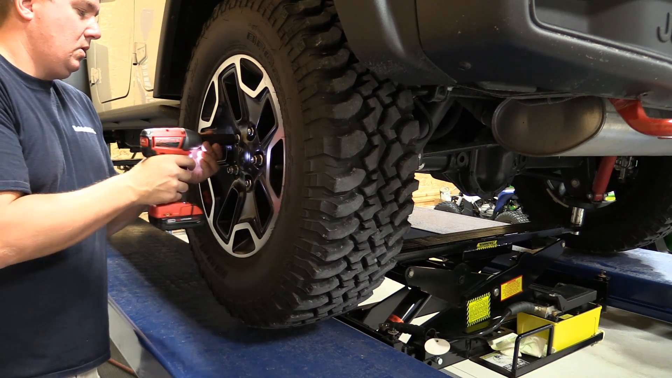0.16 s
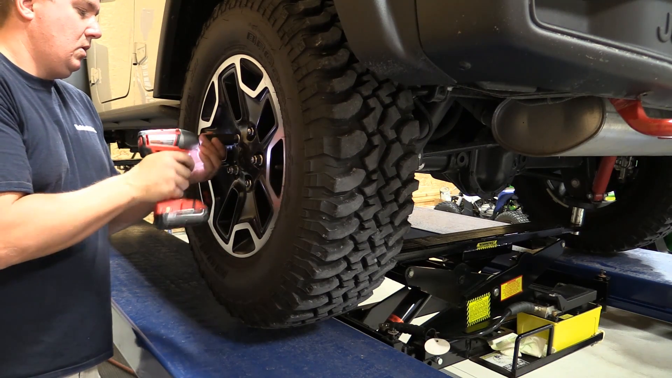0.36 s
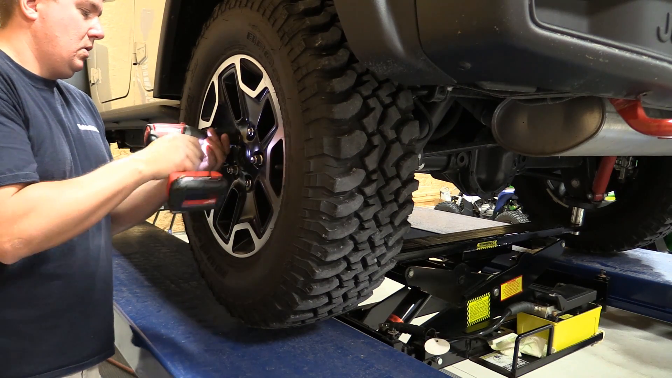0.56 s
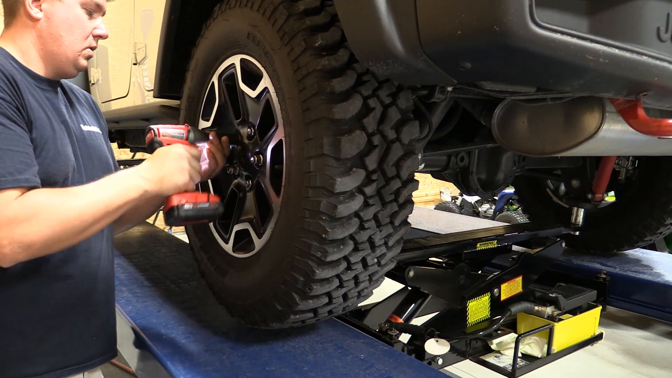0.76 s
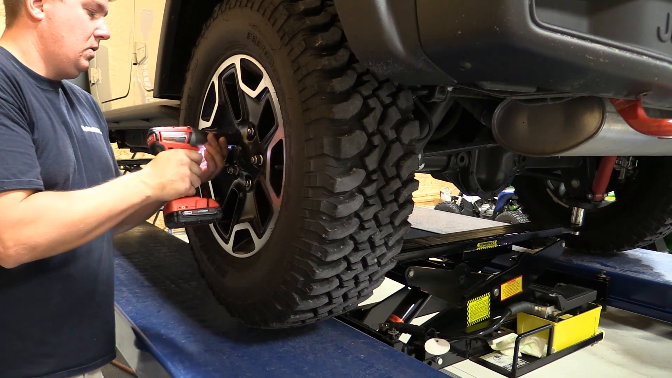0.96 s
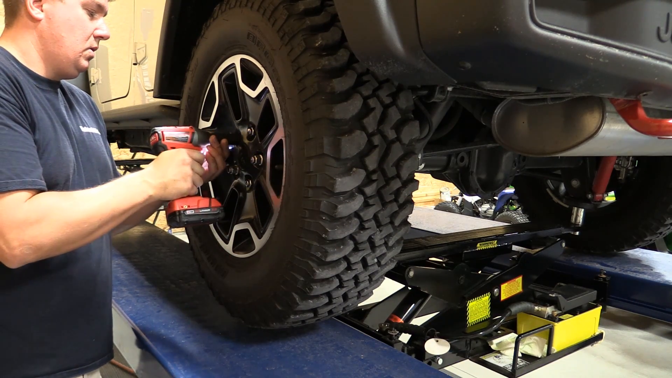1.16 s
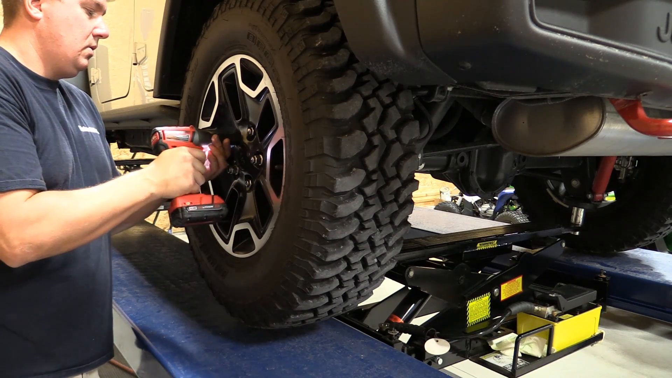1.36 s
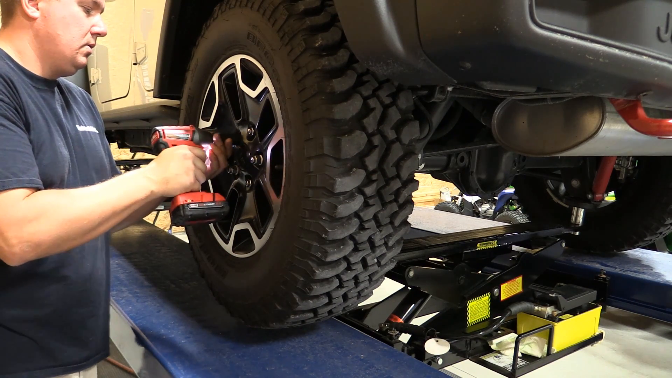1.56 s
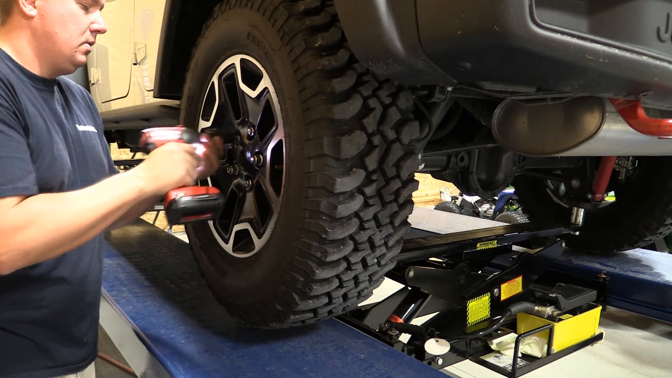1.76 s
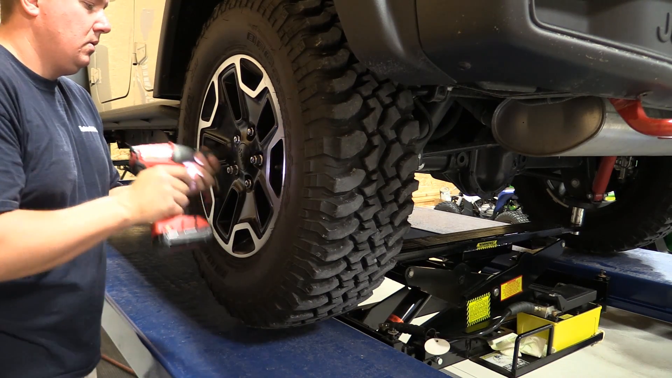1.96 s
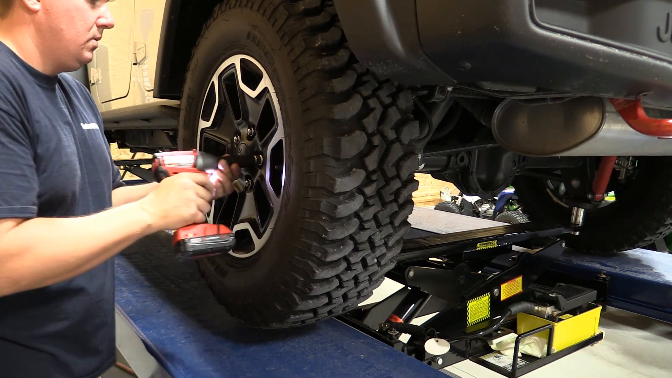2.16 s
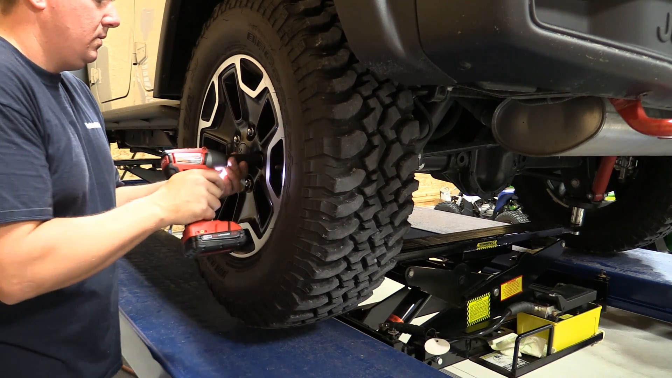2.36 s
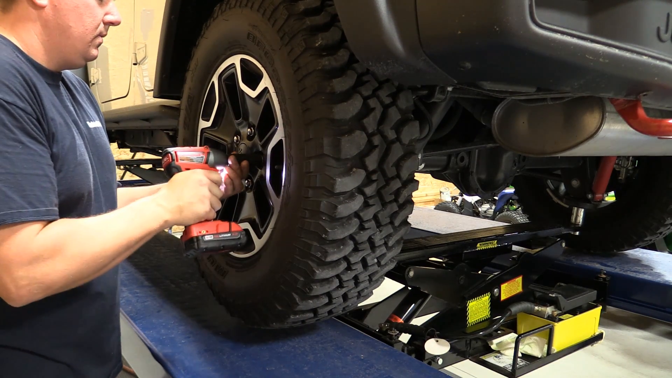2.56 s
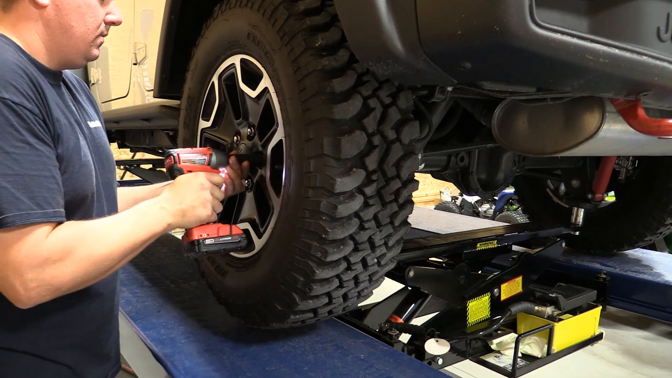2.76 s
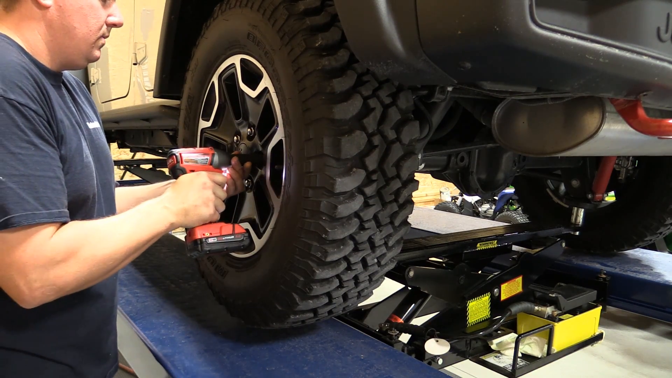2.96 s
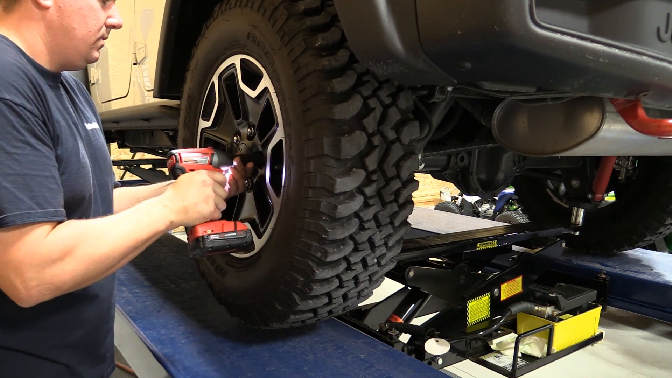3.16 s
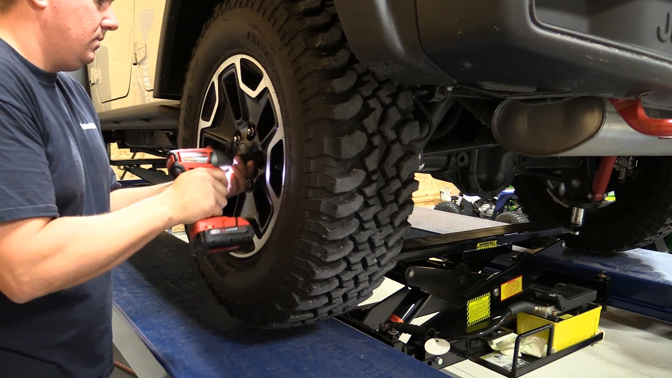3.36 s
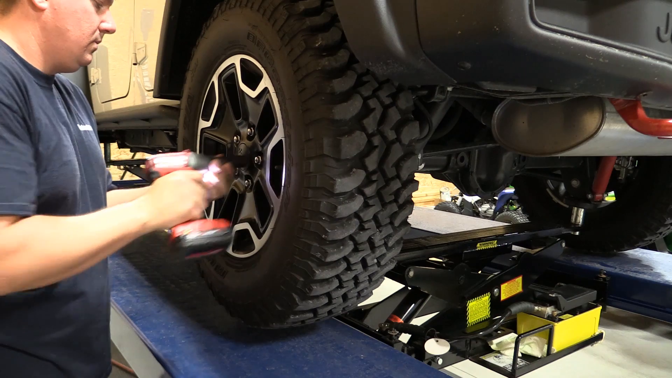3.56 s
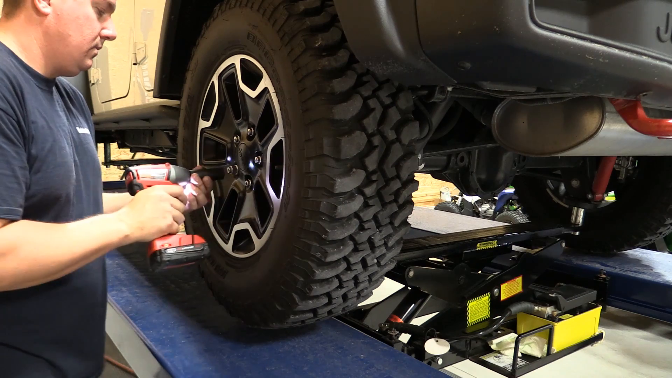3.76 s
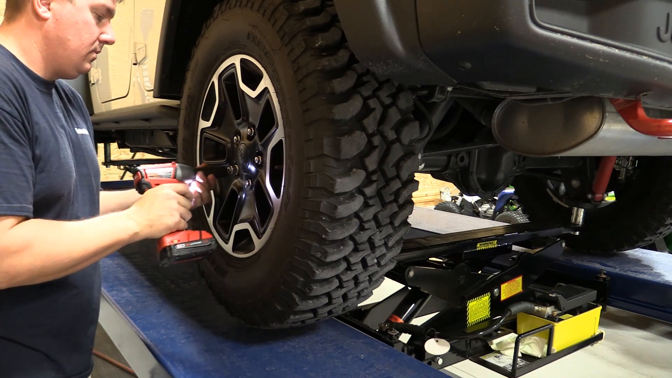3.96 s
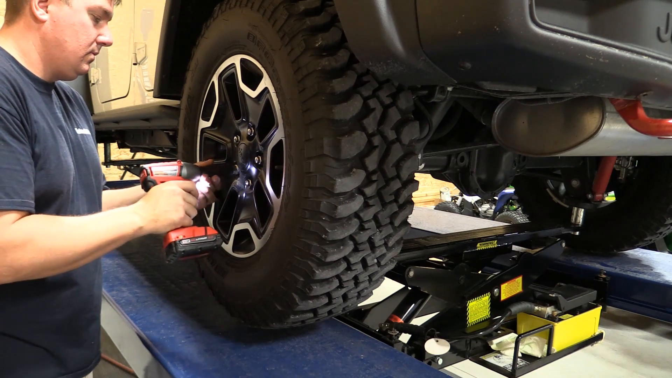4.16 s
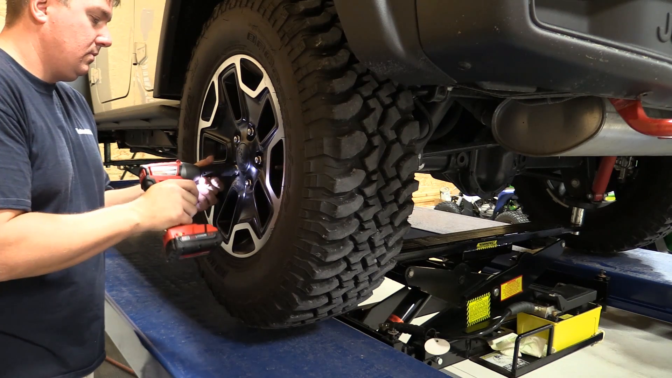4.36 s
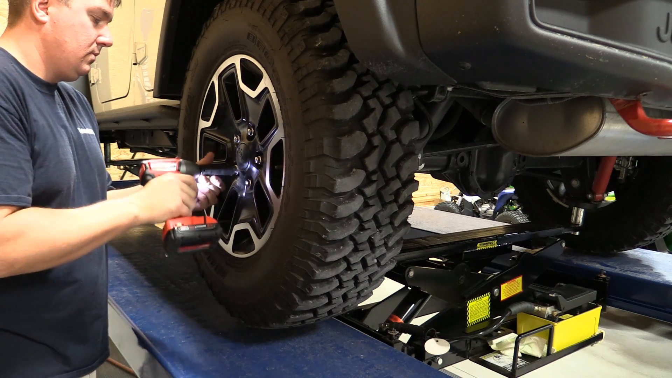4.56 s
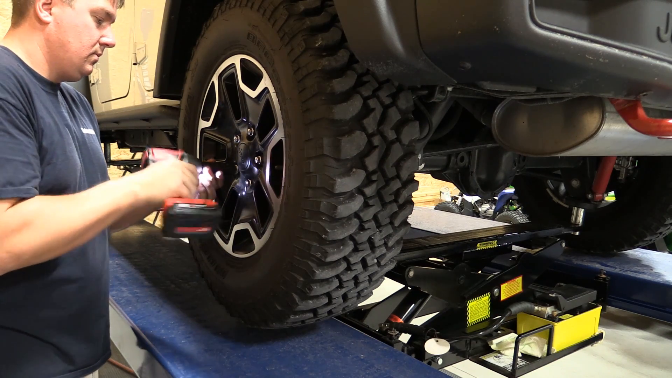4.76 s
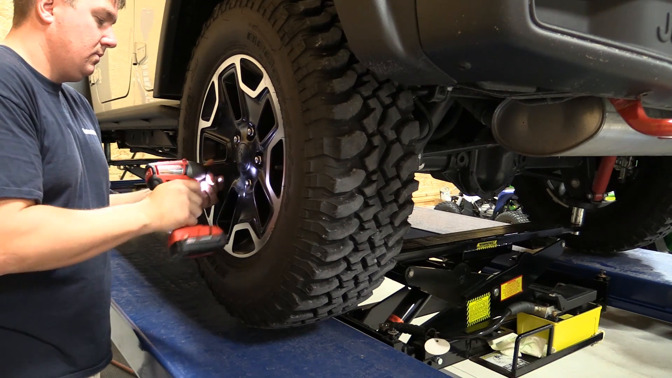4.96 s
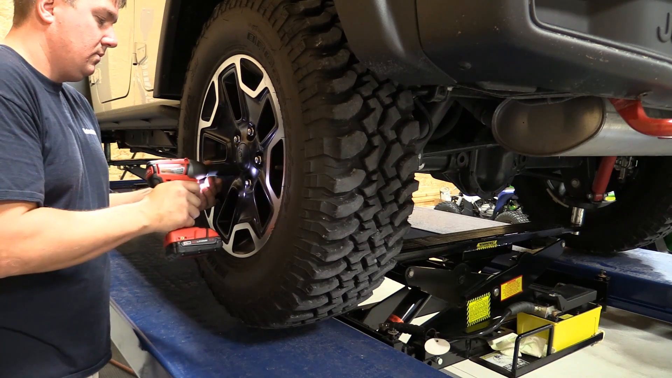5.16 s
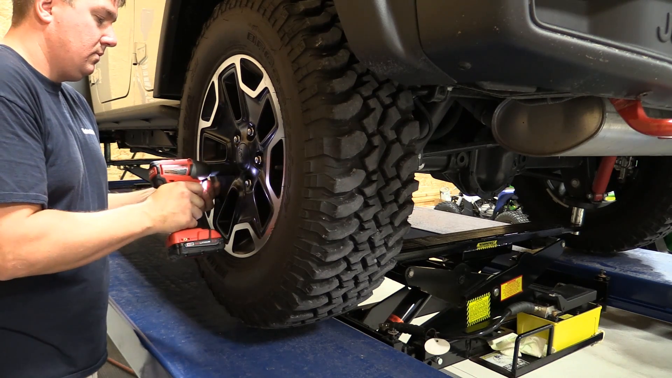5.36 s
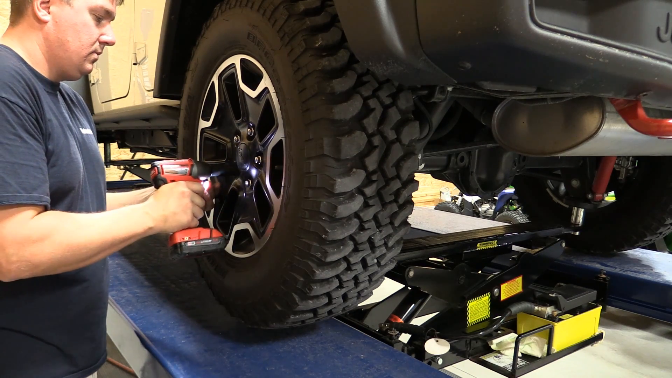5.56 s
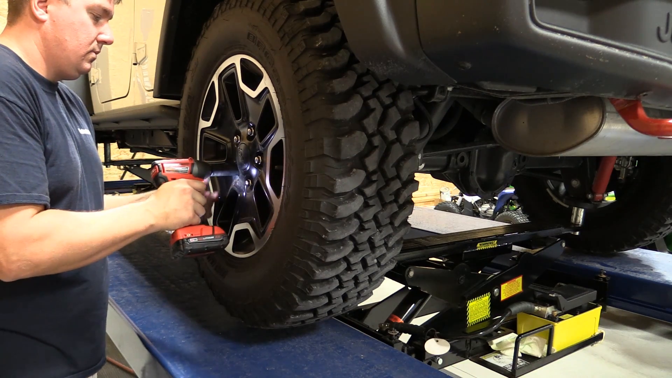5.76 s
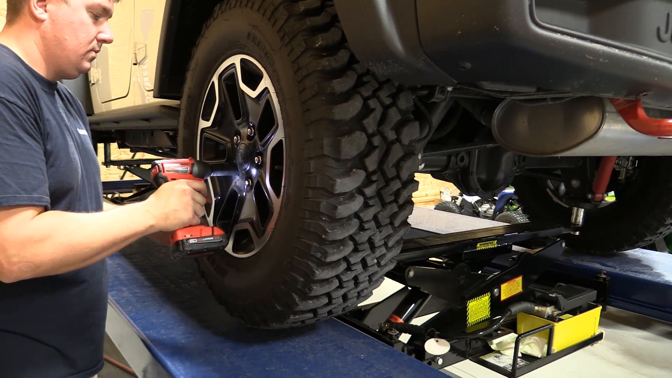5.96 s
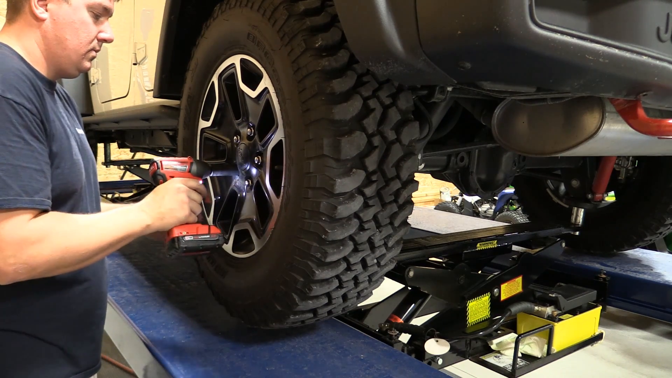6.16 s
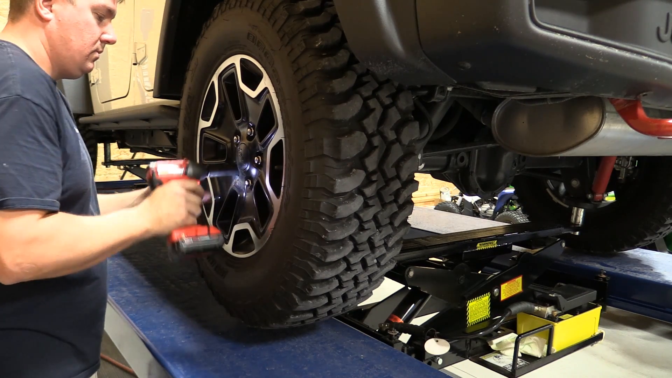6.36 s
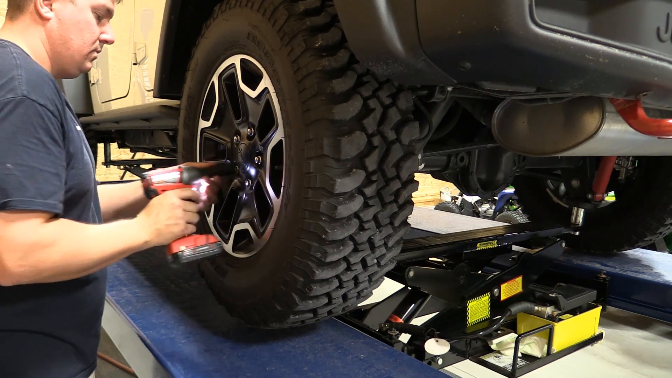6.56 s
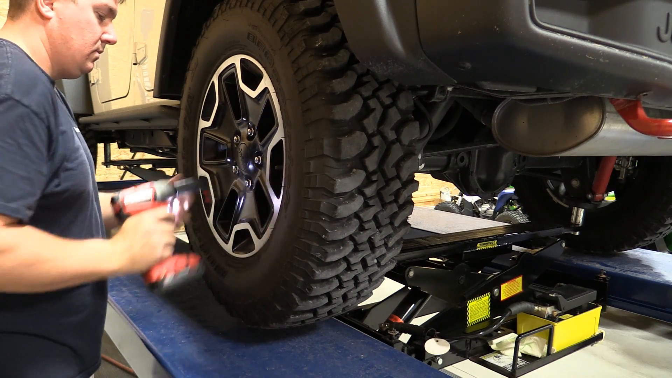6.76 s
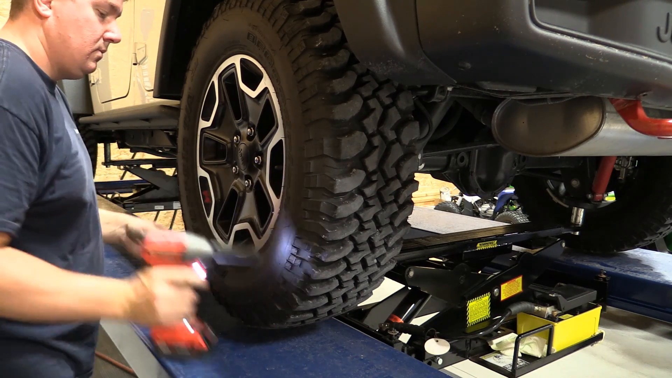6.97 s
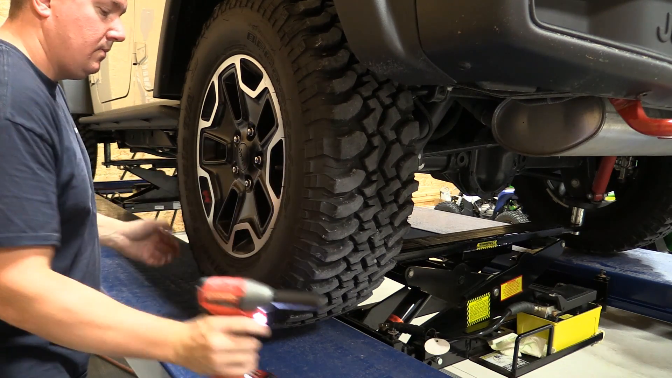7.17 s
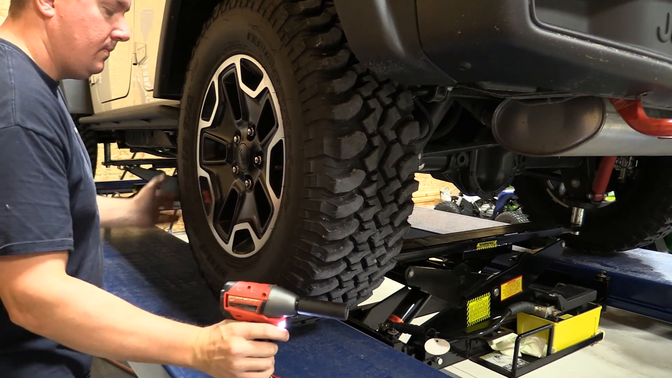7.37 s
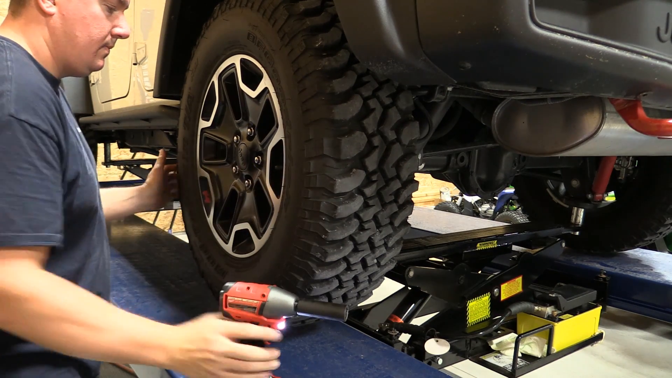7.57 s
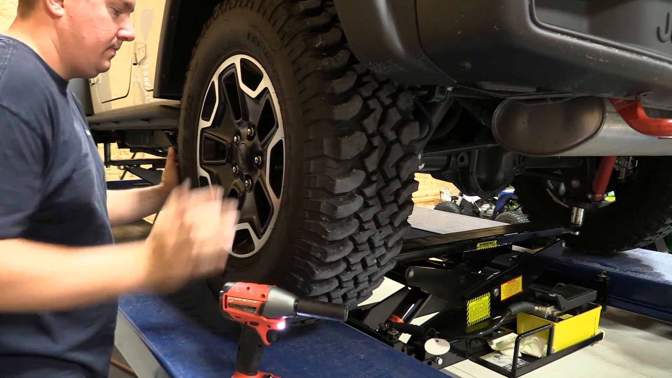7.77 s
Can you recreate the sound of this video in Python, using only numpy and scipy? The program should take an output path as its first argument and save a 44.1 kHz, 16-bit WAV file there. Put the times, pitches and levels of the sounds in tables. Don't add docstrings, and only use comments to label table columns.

```python
import sys
import numpy as np
from scipy import signal
from scipy.fft import rfft, irfft
from scipy.io import wavfile
from scipy.ndimage import uniform_filter1d

SR = 44100
rng = np.random.default_rng(int(sys.argv[2]) if len(sys.argv) > 2 else 0)


def undo_db(level):
    steps = np.asarray(level, float) / 20
    return 10 ** steps


def int16_out(signal):
    q = np.round(np.clip(np.atleast_2d(signal).T, -1, 1) * 32767)
    wavfile.write(sys.argv[1], SR, q.astype(np.int16))


N = 345303
T = np.arange(N) / SR

# frequency in Hz, level in dB per Hz.
AIR = [(15, -3.5), (27, 0.5), (40, 3), (58, -2), (160, 2), (250, -1.5), (500, -6.5), (1000, -17),
       (3000, -23), (6000, -33), (10000, -31.5), (16000, -32.5)]
AIR_DB = -56
# frequency in Hz, width in Hz, level in dB.
HUM = [(83, 34, -56), (102, 8.3, -61), (118.7, 4, -51.5)]
# start in s, length in s, pitch in Hz, level in dB.
WHINES = [(0.866, .03, 9900, -65), (2.658, 0.037, 9850, -83), (5.127, .02, 9900, -67),
          (0.536, 0.11, 4280, -60), (2.18, .07, 11200, -72), (4.382, 0.033, 11100, -69),
          (4.662, 0.12, 11200, -72), (4.666, .08, 15300, -72), (6.742, 0.11, 11250, -66),
          (7.17, 0.086, 11200, -68), (7.176, 0.11, 5550, -71)]
# frequency in Hz, t60 in s, level in dB.
GARAGE = [(81, 1.8, -0.5), (200, 0.97, 1), (490, 1.59, 2.5), (1500, 1.615, -0.5), (2220, 1.525, -1),
          (3400, 1.36, -2), (4450, 1.32, 0), (6700, 1.09, -4.5), (10500, 0.64, 7.5), (13960, 0.65, 1)]
# frequency in Hz, level in dB per Hz.
TYRE = [(30, -37), (52, -7), (68, 0.5), (95, -3.5), (130, 0.5), (175, -4.5), (260, -7), (340, -5),
        (560, -21), (900, -36.5), (1600, -56)]
# start in s, level in dB.
SLAPS = [
    (0.387, -48.5),
    (.64, -50.5),
    (2.256, -54),
    (2.329, -60.5),
    (2.451, -54.5),
    (4.196, -50),
    (4.902, -44),
    (7.299, -33),
    (7.33, -42),
]

# frequency in Hz, level in dB per Hz.
CRACK = [(88, -43.5), (150, -9), (240, -5), (328, -10.5), (398, -21), (545, -13), (821, -15.5), (1830, -15),
         (3290, -5), (8400, -13), (10200, -22), (14000, -25.5), (16000, -28.5)]
# frequency in Hz, width in Hz, level in dB.
SOCKET = [(1200, 76, -6), (2000, 45, -9), (2560, 45, -1), (3600, 150, -9), (4400, 32, -3), (5230, 70, -1),
          (8600, 200, -7)]
# frequency in Hz, width in Hz, level in dB.
ANVIL = [(1460, 56, -18.5), (2125, 37, -15), (2730, 180, -27), (3283, 280, -1), (3830, 130, -9.5),
         (4100, 350, -4), (4540, 280, -7.5), (5270, 140, -9), (5796, 190, -4), (8260, 580, -27)]
# frequency in Hz, width in Hz, level in dB.
WHEEL_THUD = [(165, 100, -42.5), (250, 60, -34), (321, 50, -34.5), (560, 56, -33), (799, 130, -31)]
# start in s, peak in dB, ring in Hz, treble in dB.
SET_DOWN = [
    (7.2698, -39, 3080, -31),
    (7.299, -18.5, 1500, -28.5),
    (7.323, -25.5, 1420, -22),
    (7.335, -30, 2940, -50),
    (7.3814, -33.5, 1460, -3),
    (7.3964, -27, 3400, -32),
    (7.5403, -51.5, 5200, -17),
    (7.5544, -44, 1050, -23),
    (7.5921, -43.5, 3230, -25),
    (7.6589, -56, 2770, -7),
]
# start in s, peak in dB, ring in Hz, bass in dB.
CLINKS = [(0.2496, -42.5, 2490, -2.5), (0.385, -38, 1070, 13), (0.4578, -37, 1050, 5.5),
          (0.553, -38.5, 4580, -9.5), (0.61, -41, 3230, 3), (0.6384, -40, 1150, -2.5),
          (0.6549, -34.5, 3820, -5), (0.7533, -42.5, 1070, -27.5), (0.836, -28.5, 3530, -7.5),
          (2.2573, -25, 2644, -4), (2.3198, -34, 3430, 5), (2.3437, -33, 3700, 1), (2.4429, -40.5, 3450, 2),
          (2.4647, -47.5, 3580, -8), (2.6258, -32.5, 3430, -11.5), (4.1413, -22, 5000, -12.5),
          (4.1518, -29, 4620, -38), (4.1953, -22, 2400, -6.5), (4.4703, -41, 3690, -29),
          (4.4866, -47, 1210, -2), (4.6742, -35.5, 3120, -16.5), (4.6833, -27, 3090, -13),
          (4.7042, -25.5, 2600, -17), (4.7167, -36, 4300, -21.5), (4.7865, -35.5, 3600, -14),
          (4.861, -33.5, 2280, -2), (4.905, -17, 1250, -7), (5.0824, -31, 3400, -8),
          (6.8192, -30, 2900, -9)]
# start in s, peak in dB, treble in dB.
SLIPS = [(1.046, -10, -29.5), (1.1247, -21, -34), (1.1616, -11.5, -14.5), (1.1995, -8.5, -16),
         (1.2373, -9.5, -20), (1.2485, -16, -17), (1.3253, -8.5, -15.5), (1.3717, -5.5, -34.5),
         (2.8238, -14, -7.5), (2.895, -16.5, -10), (2.9035, -10, -22.5), (2.9453, -9.5, -17.5),
         (2.9855, -20, -10), (2.9922, -10, -19), (3.028, -10.5, -29), (3.0358, -10, -14),
         (3.0406, -1.5, -16), (5.4947, -11, -17.5)]
# start in s, peak in dB, ring in Hz, bass in dB.
CLANKS = [(0.8797, -32.5, 2090, -8.5), (0.9074, -18, 3300, -3), (0.9181, 4.5, 3500, -13.5),
          (0.924, -25.5, 3550, -23.5), (0.937, -6.5, 3180, -16), (1.3865, -6.5, 3400, -10.5),
          (1.3899, -0.5, 3690, -9), (1.3964, 7.5, 3650, -24), (1.7466, -4.5, 3370, -29),
          (2.6788, -30, 3620, -10.5), (2.6871, -16.5, 2750, -14), (2.6974, 5.5, 3160, -14),
          (2.7059, -5, 3400, -16.5), (2.7173, -1.5, 5440, -18.5), (3.0972, 0.5, 2980, -5.5),
          (3.1046, 7, 3630, -17.5), (3.4946, -8.5, 3520, -22), (3.5086, -14, 3620, -26),
          (5.1262, -37, 3200, -3.5), (5.1474, -10, 3330, -13.5), (5.6422, 4.5, 3080, -13),
          (5.648, 5.5, 2150, -25.5), (6.021, -19, 3200, -26), (6.0301, -9, 3650, -20)]

# frequency in Hz, level in dB per Hz.
WHIRR = [(150, -48.5), (250, -8), (407, -15), (510, -8), (938, -9), (1610, -7), (2200, -9.5), (3230, -1.5),
         (4120, -5.5), (9170, -18), (11900, -33.5), (13900, -20), (16000, -52)]
# frequency in Hz, width in Hz, level in dB.
SHAKE = [(79.2, 20, -5.5), (182.5, 100, -0.5), (221, 44, -5.5), (316, 33, -12), (1315, 380, 0.5)]
# seating time in s, gear mesh at start in Hz, at full speed in Hz, mesh level in dB,
# camera gain while it spins in dB.
NUTS = [
    (1.385, 1566, 1624, -48, -4.5),
    (3.098, 1480, 1554, -48.5, -9),
    (5.64, 1344, 1624, -34, -1.5),
]
# time in s, whirr in dB.
EFFORT = [
    [(.87, -62), (.915, -21.5), (.99, -34.5), (1.06, -32), (1.2, -29), (1.4, -26), (1.5, -31), (1.78, -30)],
    [(2.66, -53.5), (2.7, -28.5), (2.77, -37.5), (2.9, -31.5), (3.0, -28), (3.09, -27.5), (3.25, -29.5),
     (3.52, -37.5)],
    [(5.11, -78.5), (5.15, -27), (5.26, -29.5), (5.4, -29), (5.66, -26), (5.77, -35.5), (6.03, -32.5),
     (6.06, -30.5)],
]
SECOND_OVER_WHIRR_DB = [-2.5, -3.5, -6]
# first blow in s, last blow in s, first level in dB,
# last level in dB, change of the rebound blows in dB.
HAMMERING = [
    (1.4216, 1.7195, -2.5, -5, -1),
    (3.1293, 3.4514, 1.4, -7, -5),
    (5.6742, 5.9973, -3, -7.5, -2.5),
]

SPIN_UP_S, ENGAGE_S, STALL_S = 0.135, 0.06, 0.03
IDLE_MESH_DB, IDLE_SECOND_DB, IDLE_SHAKE_DB = -66, -60.5, -68
SHAKE_DB, SHAKE_SLOPE = -40, 1.3
SLIP_HZ, BLOW_HZ, BLOWS_PER_S = 3180, 3400, 40.3
REBOUND_S = 0.0012
BLOW_JITTER_S, BLOW_SPREAD_DB, RING_SPREAD = 0.0003, 1.1, 0.05
BLOW_TREBLE_DB = -26.5
REBOUND_LOSS_DB, UNEVEN_DB = 4.5, 2.2
REST_DB, DUCK_DB, DEEPEST_DB, RECOVER_DB_PER_S, DUCK_S = -1.5, -15, -16.5, 20.5, 0.03


def evened(x):
    return x / np.sqrt(np.mean(x ** 2) + 1e-20)


def read(points, hz):
    f, value = np.transpose(points)
    return np.interp(np.log(hz + 1), np.log(f + 1), value)


def add(mix, s, sound):
    part = mix[round(s * SR):][:len(sound)]
    part += sound[:len(part)]


def coloured(points, size):
    gain = undo_db(read(points, np.fft.rfftfreq(size, 1 / SR)))
    return evened(irfft(rfft(rng.standard_normal(size)) * gain, size))


def causal(points, size):
    cepstrum = irfft(read(points, np.fft.rfftfreq(size, 1 / SR)) * np.log(10) / 20, size)
    cepstrum[1:size // 2] *= 2
    cepstrum[size // 2 + 1:] = 0
    click = irfft(np.exp(rfft(cepstrum)), size)
    return click / abs(click).max()


def drift(size, span):
    return evened(uniform_filter1d(uniform_filter1d(rng.standard_normal(size), span), span))


def resonate(x, hz, width):
    turn = np.exp(2j * np.pi * np.cumsum(hz * np.ones(len(x))) / SR)
    r = np.exp(-np.pi * abs(width) / SR)
    return 2 * (turn * signal.lfilter([1 - r], [1, -r], x / turn + 1e-18)).real


def tone(hz, width, steady, size):
    fuzz = evened(resonate(resonate(rng.standard_normal(size), hz, width), hz, width))
    pure = np.sin(2 * np.pi * np.cumsum(hz * np.ones(size)) / SR)
    return evened(fuzz + steady * pure)


def camera_gain():
    points = []
    for (seat, *_, spin_db), effort in zip(NUTS, EFFORT):
        grab, release = effort[1][0], effort[-1][0]
        recovered = release + (REST_DB - DEEPEST_DB) / RECOVER_DB_PER_S
        points += [(grab - DUCK_S / 2, REST_DB), (grab + DUCK_S / 2, spin_db), (seat, spin_db)]
        points += [(seat + DUCK_S, DUCK_DB), (release, DEEPEST_DB), (recovered, REST_DB)]
    return undo_db(np.interp(T, *np.transpose(sorted(points))))


def background():
    air = coloured(AIR, N) * undo_db(AIR_DB + 0.75 * drift(N, span=2000))
    return air + sum(undo_db(db) * tone(hz, width, 0.99, size=N) for hz, width, db in HUM)


def camera_noise():
    gate = np.maximum(np.cos(2 * np.pi * 29.97 * (T - 0.02)), 0) ** 2
    out = undo_db(-74.5) * gate * tone(10650, 700, 0.1, size=N)
    for s, length_s, hz, db in WHINES:
        size = round(length_s * SR)
        whine = tone(hz, hz * 0.008, 2.2, size=size) * signal.windows.tukey(size, 0.3)
        add(out, s, undo_db(db - 7.5) * whine)
    return out


def garage_tail():
    taps = np.zeros(3 * SR)
    at = np.arange(600, 3 * SR - 20, 20)
    taps[at + rng.integers(0, 20, len(at))] = rng.choice([-1., 1.], len(at))
    hz, t, z = signal.stft(taps, SR, nperseg=1024)
    t60, db = (read([(row[0], row[k]) for row in GARAGE], hz)[:, None] for k in (1, 2))
    tail = signal.istft(z * undo_db(db - 60 * t / t60), SR, nperseg=1024)[1]
    return tail / np.linalg.norm(tail)


def garage(x):
    turn = 2 * np.pi * (9 * T + np.arange(3)[:, None] / 3)
    shares = np.cos(turn) * np.sqrt(2 / 3)
    return sum(signal.fftconvolve(x * share, garage_tail())[:N] for share in shares)


def lift(near):
    keep = np.exp(-1 / (SR * 0.25))
    drive = np.sqrt(signal.lfilter([1 - keep], [1, -keep], near ** 2))
    return undo_db(-38.5) * drive * tone(80, 15, 0.5, size=N)


def slap(db):
    t = np.arange(SR // 2) / SR
    return coloured(TYRE, len(t)) * undo_db(db - 60 * t) * (1 - np.exp(-t / 0.002))


def strike(db, hz, treble_db, bass_db, clatter_db, body, clatter_s, ring_db, ring_s, modes_db):
    t = np.arange(4096) / SR
    tilt = []
    for f, level in CRACK:
        treble = (treble_db + 17.5) * np.clip(np.log2(f / 4500), 0, 1.2)
        bass = (bass_db + 16.5) * np.clip(np.log2(2200 / f), 0, 1)
        tilt.append((f, level + treble + bass - 11 * (f < 300)))
    contacts = np.zeros(256)
    at = 14 + np.cumsum(rng.integers(6, 22, 5))
    contacts[at] = undo_db(-REBOUND_LOSS_DB * np.arange(5)) * rng.choice([-1, 1], 5)
    crack = np.convolve(causal(tilt, len(t)), contacts)[:len(t)]
    clatter = coloured(tilt, len(t)) * undo_db(clatter_db + 2.8 * drift(len(t), span=50)) * np.exp(-t / clatter_s)
    ring = undo_db(ring_db) * np.sin(2 * np.pi * hz * t) * np.exp(-t / ring_s)
    f, width, level = np.transpose(body)[:, :, None]
    luck = rng.standard_normal((2, len(body), 1))
    strength = undo_db(level + modes_db + UNEVEN_DB * luck[0])
    swing = np.sin(2 * np.pi * f * (1 + 0.011 * luck[1]) * t)
    modes = (strength * swing * np.exp(-np.pi * width * t)).sum(0)
    sound = crack + (1 - np.exp(-t / 0.000073)) ** 2 * (clatter + ring + modes)
    return undo_db(db) * sound / abs(sound).max()


def spin(nut, effort, over_db):
    seat, low_hz, top_hz, mesh_db, _ = nut
    s, db = np.transpose(effort)
    t = np.arange(s[0], s[-1], 1 / SR)
    size = len(t)
    whirr_db = np.interp(t, s, db)
    load = np.clip(np.minimum((t - s[1]) / ENGAGE_S, (seat + STALL_S / 2 - t) / STALL_S), 0, 1)
    mesh_db = IDLE_MESH_DB + load * (mesh_db - IDLE_MESH_DB)
    second_db = IDLE_SECOND_DB + load * (whirr_db + over_db - IDLE_SECOND_DB)
    shake_db = IDLE_SHAKE_DB + load * (SHAKE_DB + SHAKE_SLOPE * (whirr_db + 31.5) - IDLE_SHAKE_DB)
    speed = np.sin(np.pi / 2 * np.clip((t - s[1]) / SPIN_UP_S, 0, 1)) ** 2
    hz = low_hz + (top_hz - low_hz) * speed
    hz = hz * (1 + 0.0074 * drift(size, span=500))
    whirr = coloured(WHIRR, size) * undo_db(whirr_db + 2.2 * drift(size, span=60))
    mesh = undo_db(mesh_db) * tone(hz, 120, 1.0, size=size)
    second = undo_db(second_db) * tone(2 * hz, 150, 2.0, size=size)
    shake = evened(sum(undo_db(level) * tone(f, width, 0.55, size=size) for f, width, level in SHAKE))
    sound = whirr + mesh + second + undo_db(shake_db) * shake
    return s[0], sound * signal.windows.tukey(size, 0.04)


def hammer(first_s, last_s, first_db, last_db, rebound_db):
    count = round((last_s - first_s) * BLOWS_PER_S) + 1
    luck = rng.standard_normal((count, 3))
    t = np.arange(4096) / SR
    thud = sum(undo_db(db) * np.sin(2 * np.pi * hz * t) * np.exp(-np.pi * width * t)
               for hz, width, db in WHEEL_THUD)
    rebound = np.exp(-(np.arange(count) - 1.7) ** 2)
    times = np.linspace(first_s, last_s, count) + REBOUND_S * rebound + BLOW_JITTER_S * luck[:, 0]
    levels = np.linspace(first_db, last_db, count) + rebound_db * rebound + BLOW_SPREAD_DB * luck[:, 1]
    rings = BLOW_HZ * (1 + RING_SPREAD * luck[:, 2])
    blows = []
    for s, db, hz in zip(times, levels, rings):
        steel = strike(db, hz, BLOW_TREBLE_DB - db, bass_db=-26.5, clatter_db=-14, body=ANVIL,
                       clatter_s=0.006, ring_db=-2.5, ring_s=0.001, modes_db=-9.5)
        blows.append((s, steel + undo_db(db) * thud))
    return blows


def scene():
    near = np.zeros(N)
    loose = dict(body=SOCKET, clatter_s=0.014, ring_s=0.003)
    seated = dict(clatter_db=-11.5, body=ANVIL, clatter_s=0.0048, ring_db=-7.5, ring_s=0.0021, modes_db=-11)
    for s, db in SLAPS:
        add(near, s, slap(db))
    for s, db, hz, treble_db in SET_DOWN:
        add(near, s, strike(db, hz, treble_db, -7, clatter_db=-15.5, ring_db=-11, modes_db=-27, **loose))
    for s, db, hz, bass_db in CLINKS:
        add(near, s, strike(db, hz, -32.5, bass_db, clatter_db=-10.5, ring_db=-5, modes_db=-13, **loose))
    for s, db, treble_db in SLIPS:
        add(near, s, strike(db, SLIP_HZ, treble_db, -20, **seated))
    for s, db, hz, bass_db in CLANKS:
        add(near, s, strike(db, hz, -21.5, bass_db, **seated))
    for nut, effort, over_db in zip(NUTS, EFFORT, SECOND_OVER_WHIRR_DB):
        add(near, *spin(nut, effort, over_db))
    for row in HAMMERING:
        for blow in hammer(*row):
            add(near, *blow)
    near /= camera_gain()
    wet = undo_db(-11.5) * garage(near)
    earlier = signal.fftconvolve(coloured(CRACK, SR // 2), garage_tail())[SR:]
    add(wet, 0, undo_db(-30) * earlier)
    return (near + wet + lift(near) + background() + camera_noise())[None]


def roll_off(x):
    return signal.sosfilt(signal.butter(12, 16970, fs=SR, output="sos"), x)


def record(dry):
    bass_cut = signal.butter(2, 30, "high", fs=SR, output="sos")
    heard = signal.sosfilt(bass_cut, dry) * camera_gain()
    limited = 0.8 * np.tanh(heard / 0.8)
    edge = signal.firwin(255, 15950, window=("kaiser", 9), fs=SR)[None]
    mix = signal.oaconvolve(limited, edge, "same")
    return roll_off(mix)


dry = scene()
out = record(dry)
int16_out(out)
```